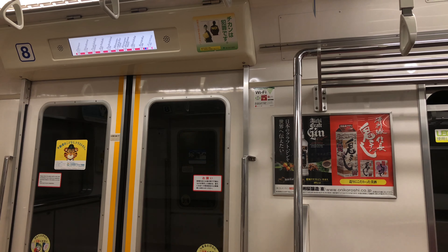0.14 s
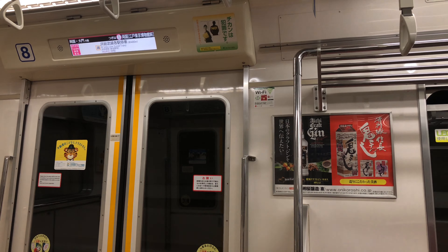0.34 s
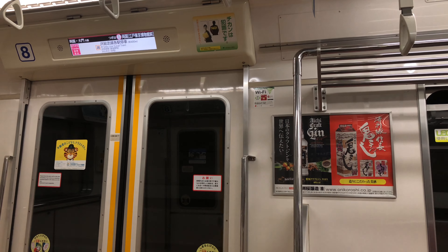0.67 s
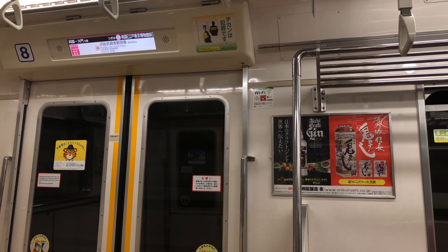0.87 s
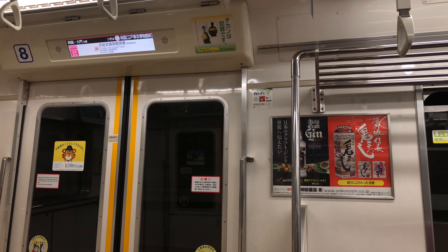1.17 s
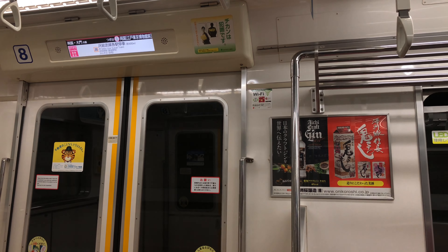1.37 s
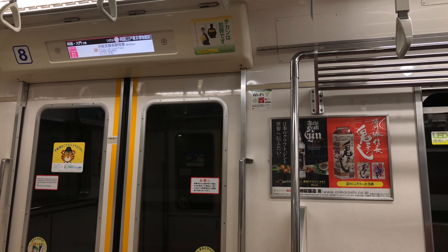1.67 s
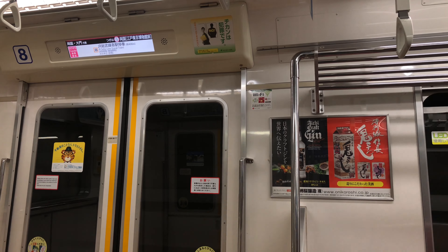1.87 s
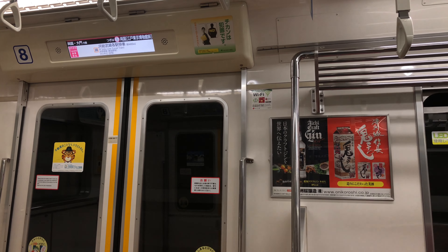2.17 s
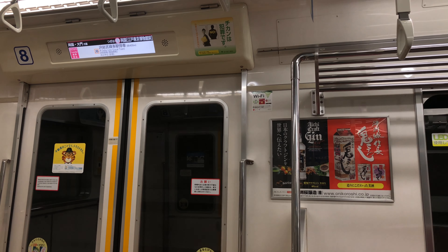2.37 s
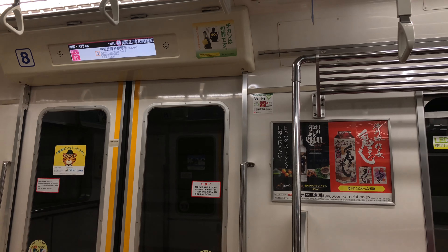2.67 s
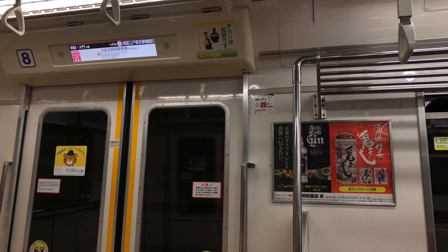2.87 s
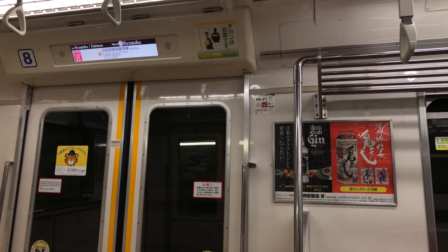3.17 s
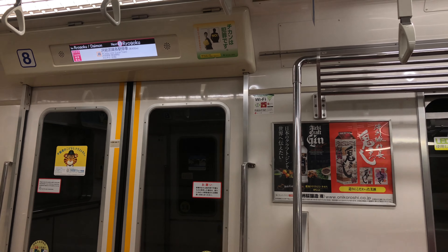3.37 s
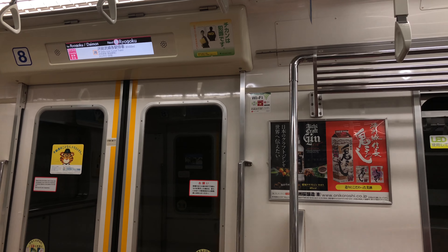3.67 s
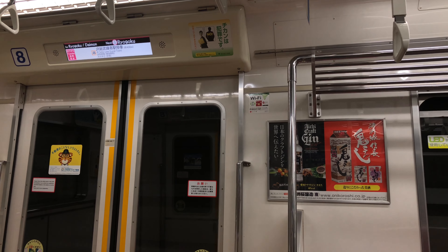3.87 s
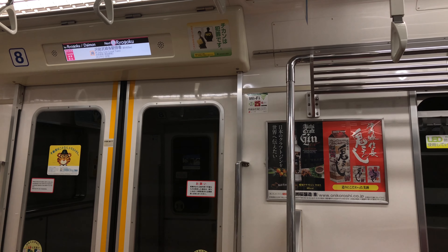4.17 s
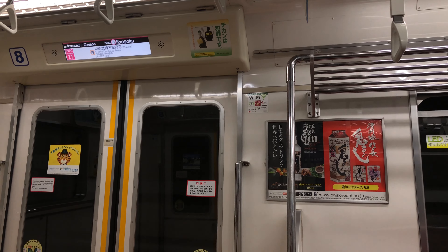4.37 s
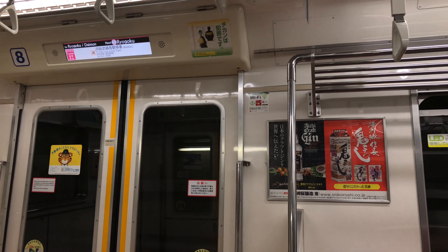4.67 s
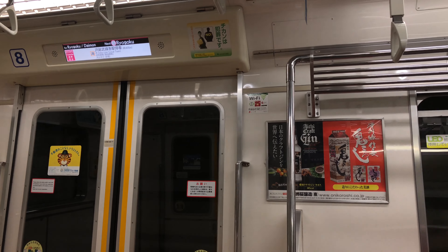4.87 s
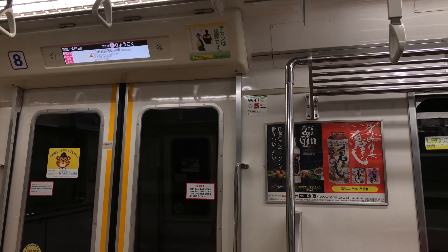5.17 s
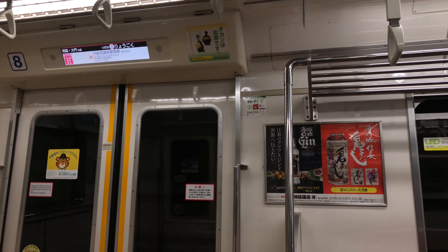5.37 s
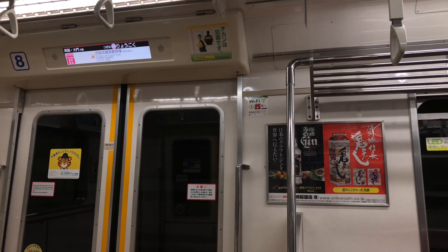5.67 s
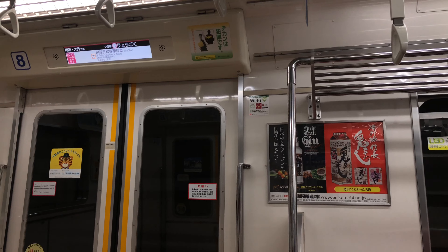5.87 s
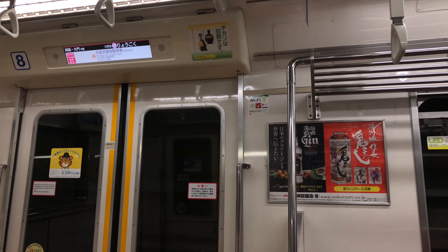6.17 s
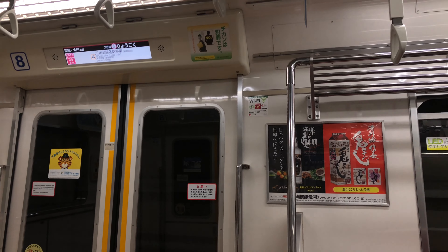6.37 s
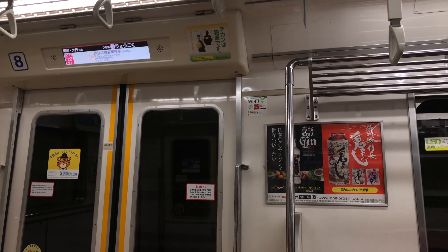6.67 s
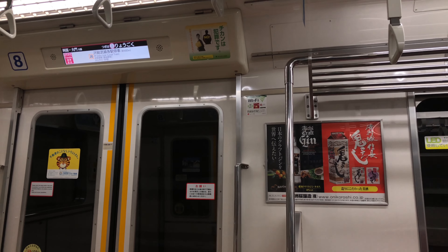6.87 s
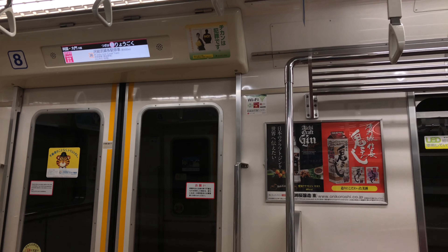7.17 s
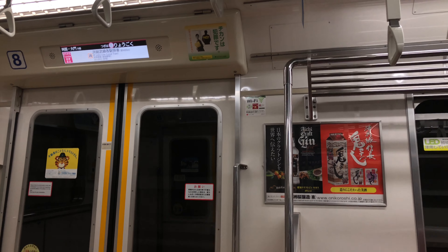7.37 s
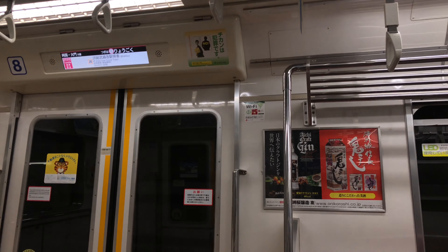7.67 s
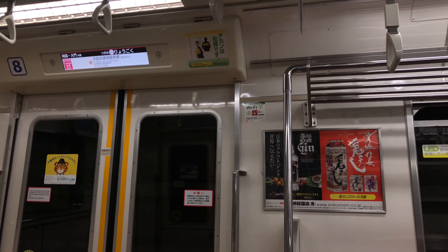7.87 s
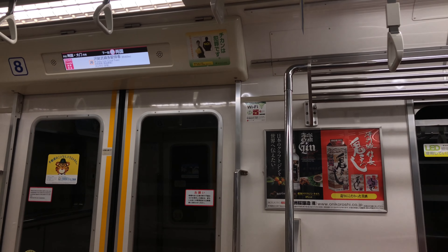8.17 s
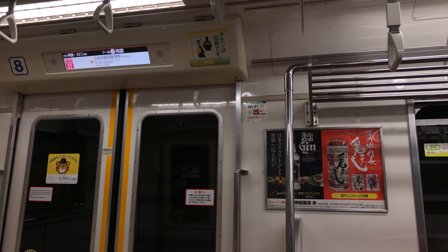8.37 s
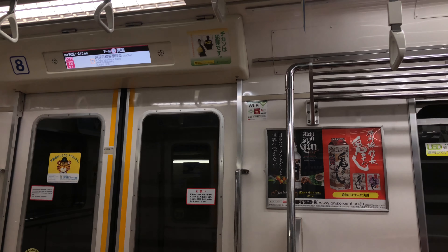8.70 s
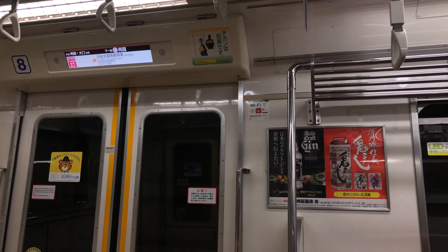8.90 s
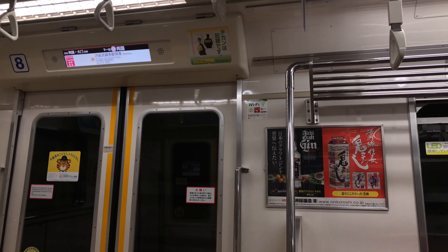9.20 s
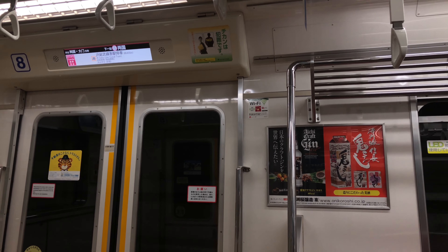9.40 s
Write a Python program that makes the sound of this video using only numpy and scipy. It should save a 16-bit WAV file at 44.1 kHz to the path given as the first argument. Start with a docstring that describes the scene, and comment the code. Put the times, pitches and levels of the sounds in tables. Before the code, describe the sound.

Inside a subway car in a tunnel, a soft rumble and low hum with a buzzy whine suddenly swell into a loud, booming, wavering roar with steely hiss.

```python
"""Subway car in a tunnel

A mains hum, fan tone, rumble, whine and soft rolling roar on smooth track; then rippled rail in a curve:
the car booms near 250 Hz, the flanges hiss and squeak. Hum, whine and ripples are stacks of overtones;
roar, rumble and hiss are shaped noise bands; fan, panel, whistles and squeaks are narrow noise."""
import sys
import numpy as np
from scipy import signal
from scipy.io import wavfile
from scipy.ndimage import uniform_filter1d, minimum_filter1d

SR = 44100
rng = np.random.default_rng(int(sys.argv[2]) if len(sys.argv) > 2 else 0)


def generate_wav(sig):
    """Save sig (samples, or channels by samples) to the path in sys.argv[1] as 16-bit PCM at SR."""
    pcm = np.round(np.clip(np.atleast_2d(sig).T, -1, 1) * 32767).astype(np.int16)
    wavfile.write(sys.argv[1], SR, pcm)


N = 420713

# Lengths of swells, squeaks and stretches run between the 1/e points of their bell curves.

# underfloor hum, fan and rumble
HUM_HZ = 59.15
HUM_DB, HUM_HOLD_S, HUM_LOSS_DB_PER_S = -29.5, 1.85, 2.0
# hum overtones: (multiple, level [dB])
HUM_ORDERS = [(1, 3), (2, 0)]
# fan tone: (frequency [Hz], width of each pass [Hz], level at the start [dB])
FAN_TONE = (323, 6, -35)
# rumble over time: (time [s], level before tilt [dB], tilt about 130 Hz [dB/octave])
RUMBLE_LEVELS = [(0, -30, -5), (1.3, -30, 1.5), (2.8, -27, 2), (3.4, -27, 4.5), (4.2, -23.5, 9),
                 (5, -28.5, -2), (5.8, -30, 2), (6.5, -27.5, 6), (7.3, -32.5, 4), (8, -31.5, 6),
                 (8.7, -34, 4), (9.54, -35, 0)]
# rumble colour: (frequency [Hz], density [dB per Hz])
RUMBLE_COLOUR = [(15, -37), (25, -21), (54, -2.5), (129, -0.5), (170, 1), (220, -31), (370, -120)]

# faint high whistles of the inverter:
# (frequency [Hz], width of each pass [Hz], level at the start [dB], level from 3 s [dB])
WHISTLES = [(6500, 120, -62, -65), (7070, 70, -59, -61), (7650, 200, -64, -63), (9170, 680, -57, -68),
            (15100, 1800, -58, -68)]

# axle whine
WHINE_HZ, WHINE_RISE_HZ_PER_S = 318.5, 2.5
WHINE_DB, WHINE_ATTACK_S, WHINE_ATTACK_DB = -31.5, 0.42, 9
WHINE_END_S, WHINE_LOSS_DB_PER_S = 4.2, 7
# whine overtones: (multiple, level [dB])
WHINE_ORDERS = [(1, 2), (2, 1.5), (3, -1.5), (4, -12), (5, -14), (6, -11.5), (7, -33), (8, -25),
                (10, -23.5)]
# swells of single overtones: (multiple, centre [s], length [s], gain [dB])
WHINE_SWELLS = [(2, 0.57, 0.37, 5.5), (4, 1.05, 0.46, 6), (6, 1.14, 0.47, 6), (7, 1.44, .4, 22),
                (10, 1.8, .4, 7), (5, 2, .7, 10.5), (1, 2.52, 0.55, 9), (6, 2.1, 0.44, 6)]

# ringing panel near 0.8 kHz
PANEL_OFFSET_DB, PANEL_FLUTTER_DB = -5.0, 3.5
# panel modes: (frequency [Hz], width of each pass [Hz], level [dB])
PANEL_MODES = [(780, 32, 0), (810, 24, -4)]
# panel over time: (time [s], level ahead of PANEL_OFFSET_DB [dB])
PANEL_LEVELS = [(0, -63), (2.9, -43), (4.25, -40), (4.5, -16.5), (4.9, -17.5), (5.15, -21), (5.35, -15),
                (6.3, -16.5), (6.9, -23.5), (7.1, -22.5), (7.8, -19), (8.0, -16), (8.25, -25), (8.45, -14),
                (8.75, -21), (8.95, -15), (9.03, -25), (9.54, -28)]

# flanges on the rail: (time [s], hiss level [dB], brightness about 8 kHz [dB/octave])
FLANGE_LEVELS = [(0, -50, -8), (.5, -49, -4.5), (.9, -50.5, -8), (2.15, -50, -9), (2.5, -52.5, -8),
                 (3.24, -48.5, -8.5), (3.43, -44.5, -5), (3.715, -41.5, -7), (3.73, -37.5, -1.5),
                 (4.03, -38.5, -4), (4.07, -41, -5), (4.78, -37.5, -4), (4.81, -31.5, -2.5),
                 (5.8, -30, -2.5), (6.1, -33, -2.5), (6.25, -36.5, -1.5), (6.9, -37, -2.5),
                 (7.25, -33, -1.5), (7.84, -33.5, -2), (7.9, -31, -3.5), (8.56, -32.5, -2), (8.66, -34, -2),
                 (9.54, -34.5, -3.5)]
# hiss flares: (centre [s], length [s], gain [dB])
HISS_FLARES = [(3.05, .08, 5), (3.92, 0.14, 7.5), (4.42, 0.44, 5.5), (5.19, 0.085, 3.5), (6.42, 0.14, 2),
               (7.07, .12, 0), (9.36, 0.19, 5.5)]
# hiss colour: (frequency [Hz], density [dB per Hz])
HISS_COLOUR = [(2060, -30), (3500, -5.5), (4250, -7.5), (5060, -7), (5590, -11), (6740, -2.5),
               (10200, -9.5), (11800, -7.5), (15600, -10.5)]
# squeaks: (centre [s], length [s], frequency [Hz], width of each pass [Hz], peak level [dB])
SQUEAKS = [(3.05, .07, 7800, 500, -51), (3.92, .1, 11200, 900, -46), (7.42, .06, 11500, 300, -47),
           (7.93, .15, 4900, 300, -41), (8.0, .4, 3200, 500, -42), (8.45, .25, 4600, 250, -43),
           (8.87, .11, 11750, 300, -38), (9.35, .19, 3250, 300, -36)]
# wheel rims: (frequency [Hz], width [Hz], lift [dB])
RIM_MODES = [(3160, 260, 5), (4970, 220, 2.5), (6750, 330, 2.5)]

# a rough spot in the rail: (centre [s], length [s], low edge [Hz], high edge [Hz], level [dB])
ROUGH_SPOT = (3.03, .11, 400, 1800, -25)

# wheels: (time [s], ripple boom ahead of BOOM_OFFSET_DB [dB], rolling roar at 0.9-3 kHz [dB])
WHEEL_LEVELS = [(0, -42, -37.5), (.6, -31, -36.5), (1.3, -36, -37), (2.2, -29, -33), (2.7, -30, -32),
                (3.05, -23, -33), (3.24, -24.5, -33.5), (3.42, -14.5, -26), (3.7, -14.5, -27.5),
                (4.05, -14.5, -23), (4.3, -13, -24), (4.45, -12, -19.5), (4.7, -10, -24), (4.85, -13, -24),
                (5.05, -9, -17.5), (5.55, -14.5, -18), (6.0, -7, -23), (6.43, -14.5, -18.5),
                (6.75, -14, -22.5), (7.1, -18.5, -21), (7.6, -13, -24), (8.45, -16.5, -23),
                (8.85, -17.5, -24.5), (9.54, -11.5, -23.5)]
# roar colour on straight track: (frequency [Hz], density [dB per Hz])
ROAR_STRAIGHT = [(88, -33), (150, -19), (315, -1), (397, -5.5), (574, -25.5), (650, -7), (807, -14.5),
                 (971, -16.5), (1210, -16.5), (2230, -23), (6000, -49), (7800, -70), (13200, -120)]
# roar colour in the curve: (frequency [Hz], density [dB per Hz])
ROAR_CURVE = [(180, -10), (300, 7), (336, -27), (395, -6.5), (483, -1.5), (613, -7), (778, -5), (915, -9),
              (1270, -9), (2020, -17), (6000, -42), (7800, -66), (13200, -120)]
CURVE_S, CURVE_BLEND_S = 3.3, 0.17
STRAIGHT_SHARE, CURVE_SHARE = 0.28, 0.96   # share of the curve's colour, 0-1
# above this roar level the curve's share falls, filling the valleys
FILL_FROM_DB, FILL_SHARE_PER_DB = -21, 0.1

# rail ripples
SHORT_RIPPLE_HZ, LONG_RIPPLE_HZ, STEADY_RIPPLE_HZ = 261.3, 203.8, 246.1
RIPPLE_DROOP_HZ_PER_S = 1.5   # short ripples only
SHORT_SHARP_DB, LONG_SHARP_DB = -2, 4.5   # dB/octave on the overtones, ahead of loss and clip
SHARP_LOSS_DB_PER_S = 0.28   # bumps get rounder further along
BOOM_OFFSET_DB = -7   # overall level of the ripple boom ahead of the car modes
BOOM_FLUTTER_DB = 1.5
# ripple overtones: (multiple, level [dB])
RIPPLE_ORDERS = [(1, 1), (2, -3), (3, -9), (4, -18), (5, -11)]
# stretches of longer ripples: (centre [s], length [s], share of the step down in rate [0-1])
LONG_STRETCHES = [(1.88, .15, .8), (2.8, 0.22, 0.97), (3.0, .1, .9), (4.45, .3, .5), (5.25, 0.083, 0.99),
                  (5.55, .4, 0.91), (6.18, .1, 0.81), (6.47, 0.36, 1), (6.9, .2, 1), (7.95, .15, 1),
                  (8.74, .14, 0.63), (8.93, .09, 0.99), (9.06, 0.063, 0.57)]
# brief swells and dips of the boom: (centre [s], length [s], gain [dB])
BOOM_SWELLS = [(1.6, 0.26, 5), (2.91, 0.045, 11.5), (3.4, .05, -3), (3.6, 0.063, 6), (3.72, 0.033, -1),
               (4.04, .15, -4), (4.2, 0.062, 2.5), (4.28, 0.06, 8.5), (4.75, 0.049, 6), (4.81, .03, -8),
               (4.84, 0.043, 8), (6.85, .15, -5.5), (6.73, .08, 9), (7.17, 0.14, 10.5), (7.28, 0.057, -2),
               (7.38, .12, 4), (7.68, .06, -6), (7.78, .14, 2.5), (7.9, .1, -7), (8.19, 0.11, 8),
               (8.86, 0.072, 9.5), (8.96, .07, 0), (9.06, 0.1, -3.5), (9.19, 0.094, 8.5), (9.35, 0.07, 2)]

# car body: (frequency [Hz], width [Hz], lift [dB])
CAR_MODES = [(181, 4.7, 1), (198.1, 12.7, 15), (229.5, 2.7, 7.5), (262.9, 17.4, 8), (278.3, 16.4, 3),
             (367.5, 29, 2.5), (472, 37, 5.5), (508, 9.8, -2.5), (548.6, 35, 8.5), (691, 4.8, 2.5),
             (706, 77, 4), (1016, 51, 5.5), (1370, 49, 1.5), (2420, 320, 3.5)]

CUTOFF_HZ = 15730


def from_db(db):
    """Amplitude factor of a level in dB."""
    return np.exp(np.asarray(db) * (np.log(10) / 20))


def rms_one(x):
    """Scale to rms 1."""
    return x / np.sqrt(np.mean(x ** 2) + 1e-20)


def in_time(rows):
    """Each column after the time, interpolated to every sample."""
    time_s, *columns = np.transpose(rows)
    return [np.interp(np.arange(N) / SR, time_s, column) for column in columns]


def at_hz(points, hz):
    """Table value at a frequency, interpolated on a log scale."""
    table_hz, values = np.transpose(points)
    return np.interp(np.log(hz), np.log(table_hz), values)


def drift(rate_hz):
    """Noise at every 40th sample through a double one-pole low-pass, run in; rms 1 before interpolation."""
    r = np.exp(-2 * np.pi * rate_hz * 40 / SR)
    noise = rng.standard_normal(N // 40 + 4002)
    slow = signal.lfilter([1], [1, -2 * r, r * r], noise)[4000:]
    return np.interp(np.arange(N) / 40, np.arange(len(slow)), rms_one(slow))


def bumps(rows, power):
    """Sum of bell curves (centre [s], length [s], height); a higher power squares the shoulders."""
    t = np.arange(N)[::20] / SR
    curves = sum(height * np.exp(-np.abs(2 * (t - s) / length_s) ** power) for s, length_s, height in rows)
    return np.repeat(curves, 20)[:N]


def resonance(x, hz, width_hz):
    """Two-pole band-pass with gain about 1 on top."""
    r = np.exp(-np.pi * width_hz / SR)
    feedback = [1, -2 * r * np.cos(2 * np.pi * hz / SR), r * r]
    return signal.lfilter(np.array([1, 0, -1]) * (1 - r * r) / 2, feedback, x)


def lifted(x, modes):
    """Each mode in turn lifts its own pitch."""
    for hz, width_hz, db in modes:
        x = x + (from_db(db) - 1) * resonance(x, hz, width_hz)
    return x


def band_pass(x, low_hz, high_hz):
    """Butterworth band-pass."""
    return signal.sosfilt(signal.butter(2, [low_hz, high_hz], "band", fs=SR, output="sos"), x)


def noise_bands(low_hz, count):
    """Third-octave bands of white noise with their centres; neighbours are unrelated."""
    white = rng.standard_normal((2, N))
    edges_hz = low_hz * 2 ** (np.arange(count + 1) / 3)
    for k, (low, high) in enumerate(zip(edges_hz, edges_hz[1:])):
        yield np.sqrt(low * high), band_pass(white[k % 2], low, high)


def narrow_noise(hz, width_hz):
    """Noise twice through one resonance; rms 1."""
    once = resonance(rng.standard_normal(N), hz, width_hz)
    return rms_one(resonance(once, hz, width_hz))


def stack(rate_hz, orders, sharp_db=0):
    """Multiples of one rate, locked in phase as in a train of bumps; sharp_db is per octave."""
    phase = 2 * np.pi * (np.cumsum(rate_hz) / SR + rng.random())
    return sum(from_db(db + sharp_db * np.log2(round(k))) * np.sin(round(k) * phase) for k, db in orders)


def hum(hum_db):
    """Mains hum: two overtones of a slightly wavering rate."""
    tone = rms_one(stack(HUM_HZ * (1 + 0.002 * drift(0.73)), HUM_ORDERS))
    return tone * from_db(hum_db + .5 * drift(4.9))


def fan(hum_db):
    """Narrow noise heard as a steady pitch; it sinks along with the hum."""
    hz, width_hz, db = FAN_TONE
    return narrow_noise(hz, width_hz) * from_db(db + hum_db - hum_db[0])


def rumble(rumble_db, tilt_db):
    """Dull low noise, rms 1 at zero tilt, then tilted about 130 Hz."""
    bands = list(noise_bands(36.25, count=7))
    spread = np.std(sum(band * from_db(at_hz(RUMBLE_COLOUR, hz)) for hz, band in bands))
    tilted = sum(band * from_db(at_hz(RUMBLE_COLOUR, hz) + tilt_db * np.log2(hz / 130)) for hz, band in bands)
    return from_db(rumble_db) * tilted / spread


def whistles():
    """Narrow whistling noise; levels move steadily until 3 s, then hold, with a flutter on top."""
    t, out = np.arange(N) / SR, 0
    for hz, width_hz, start_db, end_db in WHISTLES:
        level_db = np.interp(t, [0, 3], [start_db, end_db]) + 1.8 * drift(3.4)
        out = out + narrow_noise(hz, width_hz) * from_db(level_db)
    return out


def axles(rate_hz, whine_db, apart, waver, swell_db, count):
    """A buzzy whine from axles at unequal, wavering rates; each overtone swells by itself."""
    orders = []
    for multiple, db in WHINE_ORDERS:
        swells_db = sum(bumps([row[1:]], 3.2) for row in WHINE_SWELLS if round(row[0]) == round(multiple))
        orders.append((multiple, db + swell_db * drift(1.1) + swells_db))
    whine = 0
    for k in range(count):
        detune = apart * (k - (count - 1) / 2) + waver * drift(10.12)
        whine = whine + stack(rate_hz * (1 + detune), orders)
    return from_db(whine_db) * rms_one(whine)


def panel(panel_db):
    """A close pair of ringing modes, each a narrow noise."""
    modes = sum(from_db(db) * narrow_noise(hz, width_hz) for hz, width_hz, db in PANEL_MODES)
    return from_db(panel_db + PANEL_OFFSET_DB) * rms_one(modes)


def squeaks():
    """Flange squeaks: narrow noise that swells and dies like a bell curve."""
    t = np.arange(N) / SR
    return sum(narrow_noise(hz, width_hz) * from_db(db) * np.exp(-(2 * (t - s) / length_s) ** 2)
               for s, length_s, hz, width_hz, db in SQUEAKS)


def flange_hiss(hiss_db, bright_db, patchy_db):
    """Rubbing steel: bright noise that flickers, partly in all bands at once."""
    out, together = 0, drift(8.8)
    for hz, band in noise_bands(3440, count=7):
        tilt_db = bright_db * np.log2(hz / 8000)
        flicker_db = patchy_db * (0.46 * together + 0.5 * drift(12.0))
        out = out + band * from_db(at_hz(HISS_COLOUR, hz) + tilt_db + flicker_db)
    return from_db(hiss_db) * rms_one(out)


def rough_spot(s, length_s, low_hz, high_hz, db):
    """A short broad burst, duller than white."""
    band = band_pass(rng.standard_normal(N), low_hz, high_hz)
    dull = rms_one(signal.lfilter([1], [1, -.9], band))
    return from_db(db) * dull * np.exp(-(2 * (np.arange(N) / SR - s) / length_s) ** 4)


def roar(roar_db, curve, patchy_db):
    """Rail roughness shakes wheels and floor; the colour changes as the curve is entered."""
    out, curve = 0, np.clip(curve, 0, 1)
    for hz, band in noise_bands(140.5, count=16):
        straight_db = at_hz(ROAR_STRAIGHT, hz) - at_hz(ROAR_STRAIGHT, 1300)
        bend_db = at_hz(ROAR_CURVE, hz) - at_hz(ROAR_CURVE, 1477)
        colour_db = straight_db + curve * (bend_db - straight_db)
        out = out + band * from_db(colour_db + patchy_db * drift(3.4))
    # unit white noise has rms 1 over SR / 2; refer it to the 0.9-3 kHz band
    return from_db(roar_db) * out * np.sqrt(SR / 2 / (3000 - 900))


def ripples(rate_hz, boom_db, sharp_db, spread, swell_db, count):
    """Each wheel rides wavering ripples of changing length; every second one is on an even stretch."""
    sharp_db = np.clip(sharp_db, -6, 4)   # bumps wear only so sharp
    rates_hz = [rate_hz, np.full(N, float(STEADY_RIPPLE_HZ))]
    wheels = 0
    for k in range(count):
        gain = from_db(swell_db * drift(6.5))
        wheel_hz = rates_hz[k % 2] * (1 + spread * drift(14))
        wheels = wheels + gain * stack(wheel_hz, RIPPLE_ORDERS, sharp_db)
    return from_db(boom_db + BOOM_OFFSET_DB) * rms_one(wheels)


def car_body(x):
    """Floor, walls and enclosed air colour what the wheels send up."""
    return lifted(x, CAR_MODES)


def scene():
    """Sum of all sources; rim modes colour everything but the whistles, squeaks and underfloor."""
    t = np.arange(N) / SR
    hum_db = HUM_DB - HUM_LOSS_DB_PER_S * np.maximum(t - HUM_HOLD_S, 0)
    underfloor = hum(hum_db) + fan(hum_db) + rumble(*in_time(RUMBLE_LEVELS))

    attack_db = WHINE_ATTACK_DB * np.maximum(1 - t / WHINE_ATTACK_S, 0)
    whine_db = WHINE_DB - attack_db - WHINE_LOSS_DB_PER_S * np.maximum(t - WHINE_END_S, 0)
    whine_hz = WHINE_HZ + WHINE_RISE_HZ_PER_S * t
    whine = axles(whine_hz, whine_db, apart=.017, waver=.013, swell_db=1.5, count=3)
    ringing = panel(in_time(PANEL_LEVELS)[0] + PANEL_FLUTTER_DB * drift(2.5))

    hiss_db, bright_db = in_time(FLANGE_LEVELS)
    hiss = flange_hiss(hiss_db + bumps(HISS_FLARES, 1.5), bright_db, patchy_db=1.0)

    boom_db, roar_db = in_time(WHEEL_LEVELS)
    entered = (1 + np.tanh((t - CURVE_S) / CURVE_BLEND_S)) / 2
    curve = STRAIGHT_SHARE + (CURVE_SHARE - STRAIGHT_SHARE) * entered
    curve = curve - FILL_SHARE_PER_DB * np.maximum(roar_db - FILL_FROM_DB, 0)
    rolling = roar(roar_db, curve, patchy_db=0.95) + rough_spot(*ROUGH_SPOT)

    boom_db = boom_db + bumps(BOOM_SWELLS, 2) + BOOM_FLUTTER_DB * drift(6.1)
    longer = np.clip(bumps(LONG_STRETCHES, 4), 0, 1)
    short_hz = SHORT_RIPPLE_HZ - RIPPLE_DROOP_HZ_PER_S * t
    rate_hz = short_hz + longer * (LONG_RIPPLE_HZ - short_hz)
    sharp_db = SHORT_SHARP_DB + longer * (LONG_SHARP_DB - SHORT_SHARP_DB) - SHARP_LOSS_DB_PER_S * t
    rolling = rolling + ripples(rate_hz, boom_db, sharp_db, spread=.05, swell_db=2.0, count=4)

    car = lifted(car_body(rolling) + ringing + whine + hiss, RIM_MODES)
    return (car + whistles() + squeaks() + underfloor)[None]


def record(dry):
    """The microphone drops the deepest bass, a limiter ducks ahead of peaks, the top is cut."""
    top, bass_cut_hz, span_samples = .94, 47, 441
    heard = signal.sosfilt(signal.butter(4, bass_cut_hz, "high", fs=SR, output="sos"), dry)
    needed_gain = np.minimum(1, top / (np.abs(heard) + 1e-9))
    gain = minimum_filter1d(needed_gain, size=2 * span_samples + 1)
    limited = heard * uniform_filter1d(gain, size=span_samples)
    return signal.sosfilt(signal.ellip(18, .3, 100, CUTOFF_HZ, fs=SR, output="sos"), limited)


dry = scene()
out = record(dry)
generate_wav(out)
```